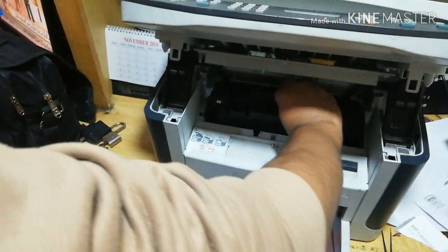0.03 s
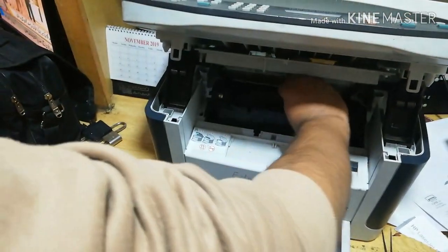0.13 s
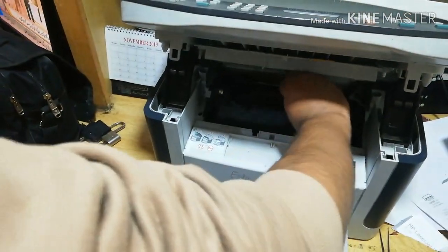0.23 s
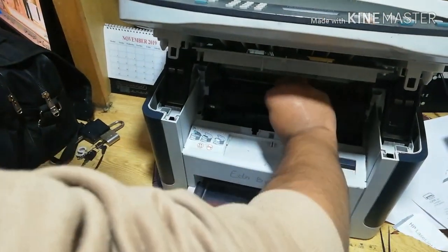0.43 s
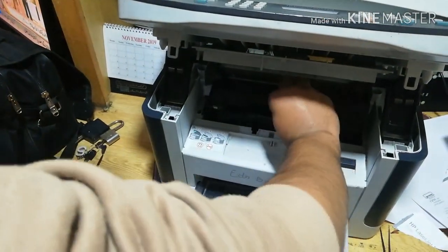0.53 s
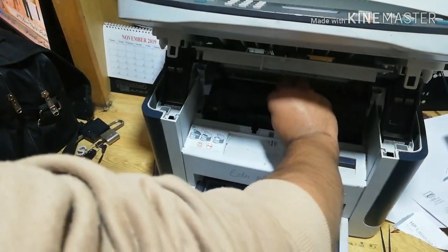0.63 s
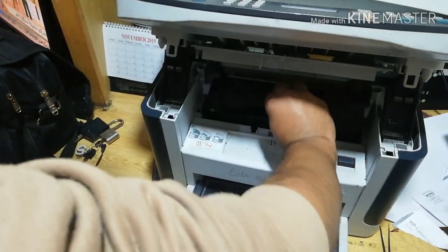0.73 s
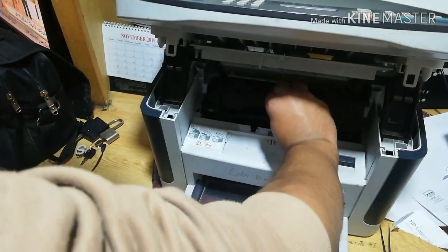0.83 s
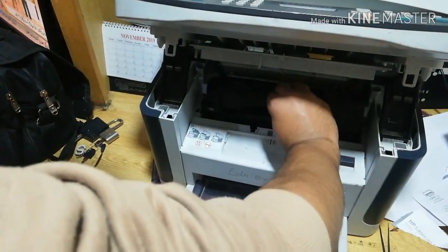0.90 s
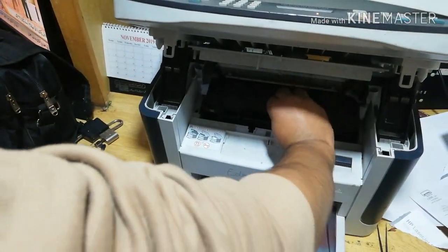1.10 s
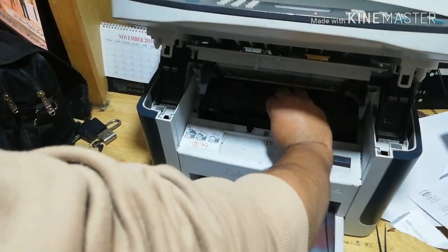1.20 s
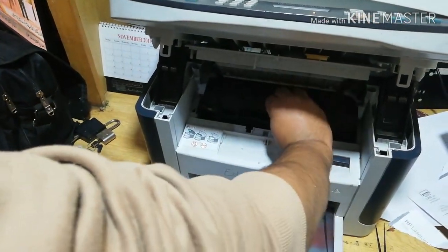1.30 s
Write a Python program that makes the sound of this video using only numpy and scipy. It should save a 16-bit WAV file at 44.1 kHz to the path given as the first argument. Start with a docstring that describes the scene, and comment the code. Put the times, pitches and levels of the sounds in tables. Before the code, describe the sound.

A toner cartridge clacks as a hand rocks it inside a printer. Light ticks lead to loud plastic clatter with hollow knocks, then brief scrapes, squeaks and a final snap, close to the microphone in a small, quiet room.

```python
"""Light plastic ticks and a faint scrape come first, then loud clacks: a hand rocks a toner cartridge
in the open bay of a desktop printer, close to a stereo microphone in a small, quiet room.
Edges strike the shell, the hollow cartridge knocks on its seat, the chassis thumps the desk and a
small spring pings. In between, the cartridge scrapes and squeaks along its guides; at last it snaps
home. The treble sits to the right, with short reflections and a low room rumble behind it."""
import sys
import numpy as np
from scipy import signal
from scipy.fft import rfft, irfft
from scipy.io import wavfile
from scipy.ndimage import uniform_filter1d

SR = 44100
rng = np.random.default_rng(int(sys.argv[2]) if len(sys.argv) > 2 else 0)


def bounce(signal):
    """Save signal as a 16-bit WAV file at the path given by the first command-line argument."""
    frames = np.transpose(np.atleast_2d(signal))
    limited = np.clip(frames, -1, 1)
    pcm = np.round(limited * 32767).astype(np.int16)
    wavfile.write(sys.argv[1], SR, pcm)


N = 59535
T = np.arange(N) / SR
HZ = np.maximum(np.arange(N + 1) * SR / (2 * N), 1)
ATTACK_S = .0018  # rise of plastic and spring contacts


# Colour of the plastic shell: f/Hz, relative level/dB
SHELL_COLOUR = [(60, -10.5), (150, -8), (210, -3.5), (330, -3.5), (410, -5), (560, -6.5), (780, -3.5),
                (950, -1), (1250, 0), (1750, -2), (2300, -2), (3100, -4), (5000, -8), (6400, -13),
                (8000, -11), (9700, -6.5), (10800, -16.5), (13000, -23), (15000, -37), (16500, -41)]
# Contacts in the bay: t/s, level/dB, lows/dB, treble/dB, t60/s, struck part's note f/Hz, its lift/dB
PLASTIC_CONTACTS = [(0.046, -48.5, -13, 11, 0.067, 1630, 12.5), (0.095, -63, -11, 8, 0.054, 2160, 18),
                    (0.114, -37.5, -25, 1.5, 0.075, 2220, 6), (0.1736, -38, -19, 8.5, 0.085, 2340, 12),
                    (0.186, -48, 3, 6, 0.18, 2310, 11), (0.2271, -28.5, -5, 5.5, 0.11, 3680, 14.5),
                    (0.243, -21.5, 4, -38, 0.058, 780, 7.5), (0.294, -40, -3, 4.5, 0.27, 1300, -5),
                    (0.311, -33.5, -10, -2, 0.1, 2550, 7.5), (0.3384, -23.5, -0.5, 2, 0.1, 5050, 14),
                    (0.35, -31.5, 7, -4, 0.21, 1850, 8.5), (0.396, -25.5, -1, 5.5, 0.1, 1280, 12),
                    (0.4, -22.5, -8.5, 8.5, 0.14, 2200, 5.5), (0.4185, -19.5, -23, -10, 0.15, 1252, 9),
                    (0.443, -26, -5, -4, 0.11, 1970, 9), (0.46, -25, -11, -16, 0.034, 1320, -10),
                    (.52, -38, 9, 1, .04, 3140, 19.5), (0.5317, -20.5, -9, 5, 0.044, 1404, 10),
                    (0.536, -27, -18, 9, 0.12, 2210, 20), (0.5422, -35.5, -36, 21, 0.033, 2280, 27.5),
                    (0.5547, -22, 1, 7, 0.036, 2200, 7), (0.686, -53.5, -6, 5, 0.36, 2050, 12.5),
                    (.8035, -30, -4, 6.5, 0.11, 1770, 6.5), (.859, -40, 0, 13, 0.026, 2370, 10),
                    (0.898, -37, -8, 2, 0.1, 3500, 14.5), (0.909, -48.5, 8.5, 27, 0.06, 1170, -5),
                    (1.0861, -30.5, -14, 1.5, 0.08, 1360, 12.5), (1.0899, -28.5, -18, 11, 0.036, 2220, 19),
                    (1.108, -25.5, -17.5, -14, 0.028, 2300, 3), (1.147, -17.5, -17, 9.5, 0.036, 2130, 7)]
def clacks(lows_hz=584, treble_hz=5600, note_spread=.4):
    """Edges excite dense, damped shell modes. Returns the direct sound and a plainer one that spreads."""
    lows = 1 / (1 + (HZ / lows_hz) ** 3)
    treble = 1 / (1 + (treble_hz / HZ) ** 3)
    direct, spread = 0, 0
    for start, db, lows_db, treble_db, t60, note_hz, lift_db in PLASTIC_CONTACTS:
        burst = stereo_noise() * grains() * struck(start, ATTACK_S, t60)
        body_db = unit_power(SHELL_COLOUR) + db + lows_db * lows + treble_db * treble
        note_db = lift_db * resonance(note_hz, relative_width=.07)
        direct += colour(burst, body_db + note_db)
        spread += colour(burst, body_db + note_spread * note_db)
    return direct, spread


# The shell's longer rings: f/Hz, relative level/dB, t60/s
PANEL_MODES = [(1160, -22, .25), (1262, -22, .25), (1365, -23, .24), (2100, -25, .2), (2240, -26, .2),
               (2288, -24, .22), (2417, -25, .2), (9200, -24, .14)]
def shell_rings(drive):
    """A few panel modes ring on after the contacts."""
    response = sum(from_db(db) * stereo_sine(hz) * struck(0, ATTACK_S, t60)
                   for hz, db, t60 in PANEL_MODES)
    return from_db(-45.5) * signal.fftconvolve(drive, response, axes=1)[:, :N]


# Cartridge against its seat: t/s, level/dB, f/Hz, t60/s
SEAT_KNOCKS = [(.229, -35.5, 222, 0.3), (.244, -27, 203, 0.12), (.34, -30.5, 216, 0.052),
               (.349, -24.5, 339.4, 0.062), (.398, -32, 303, 0.1), (.56, -39, 236.3, 0.38),
               (.9, -44, 206, 0.54)]
def knocks():
    """Each knock wakes one low mode of the hollow cartridge, dead centre at the microphone."""
    return bumps(SEAT_KNOCKS, attack_s=.0033)


# Chassis against the desk: t/s, level/dB, f/Hz, t60/s
DESK_THUMPS = [(.02, -49.5, 46, 0.73), (.238, -40, 99.6, 0.14), (.34, -37.5, 90, 0.18),
               (.42, -31.5, 118.4, .17), (.531, -33, 81.4, 0.27), (.575, -35, 122.3, 0.22),
               (1.09, -38.5, 84, .1), (1.163, -39.5, 91.4, .18), (1.185, -42, 117.5, 0.14)]
def thumps():
    """The heavy chassis bumps the desk, one soft bass note at a time."""
    return bumps(DESK_THUMPS, attack_s=.012)


# Flicks of the spring: t/s, level/dB
SPRING_FLICKS = [(.339, -31.5), (0.5185, -38.5), (0.896, -40.5)]
# Its modes: f/Hz, relative level/dB, t60/s
SPRING_NOTES = [(4720, 9.5, 0.021), (4960, 8, 0.022), (5260, -4, 0.035)]
def pings():
    """The flicked spring rings in short, high notes."""
    return sum(from_db(db + mode_db) * stereo_sine(hz) * struck(start, ATTACK_S, t60)
               for start, db in SPRING_FLICKS for hz, mode_db, t60 in SPRING_NOTES)


# Slides along the guides: t/s, length/s, level/dB
GUIDE_SLIDES = [(-.02, 0.068, -54.5), (0.151, 0.088, -44.5), (0.565, 0.15, -49), (0.842, 0.097, -37.5),
                (1.063, 0.095, -43.5), (1.188, .07, -53)]
def scrapes():
    """Grainy friction sounds through the shell."""
    pressure = sum(from_db(db) * stroke(start, length) for start, length, db in GUIDE_SLIDES)
    return colour(stereo_noise() * grains() * pressure, unit_power(SHELL_COLOUR))


# Squeaks on the guides: t/s, length/s, rasp level/dB, tone level/dB, first slip f/Hz, last slip f/Hz
GUIDE_SQUEAKS = [(0.766, 0.036, -40, -45.5, 1400, 960), (1.016, 0.063, -36.5, -40, 1090, 1170)]
# Colour of the rasp: f/Hz, relative level/dB
RASP_COLOUR = [(400, -26), (850, -6.5), (1300, -5), (1800, -13), (3000, -9), (6500, -19), (8600, -9),
               (9900, 2.5), (11000, -12.5), (14000, -22), (16500, -33)]
def squeaks(rasp_depth=.55):
    """Plastic sticks and slips in an unsteady tone; each slip lets out a puff of bright rasp."""
    tones, rasp = 0, 0
    for start, length, rasp_db, tone_db, first_hz, last_hz in GUIDE_SQUEAKS:
        slip_hz = np.interp(T, [start, start + length], [first_hz, last_hz])
        slip = unsteady_tone(slip_hz, jitter=.025)
        swell = stroke(start, length)
        tones += from_db(tone_db) * swell * slip
        rasp += from_db(rasp_db) * swell * (1 + rasp_depth * slip) * stereo_noise()
    return tones + colour(rasp, unit_power(RASP_COLOUR))


# The guide's whistle: t/s, length/s, level/dB, f/Hz
GUIDE_WHISTLE = (.872, .04, -41, 5150)
def whistle():
    """Friction feeds one thin, high tone during a slide."""
    start, length, db, hz = GUIDE_WHISTLE
    return from_db(db) * stroke(start, length) * unsteady_tone(hz, jitter=.0077)


# Decay of the small room: f/Hz, t60/s
ROOM_DECAY = [(100, 0.92), (250, 0.4), (600, 0.29), (2000, 0.27), (5000, 0.24), (10000, 0.21),
              (16000, 0.16)]
# Strength of its reflections: f/Hz, level/dB relative to the sound sent in
ROOM_GAIN = [(80, 1.5), (250, 4), (700, -3.5), (2000, -7), (5000, -7), (10000, -9)]
def room(sound, bands=12, delay_s=.0039, build_s=.0046):
    """Diffuse reflections of bay and room reach the microphone just late and die band by band."""
    noise = rfft(stereo_noise(), 2 * N)
    centres_hz = np.geomspace(60, 16000, bands)
    response = 0
    for hz, weights in zip(centres_hz, np.eye(bands)):
        band = irfft(noise * np.interp(np.log(HZ), np.log(centres_hz), weights))[:, :N]
        tail = struck(delay_s, build_s, at_hz(ROOM_DECAY, hz))
        tail /= np.sqrt(np.sum(tail ** 2))
        response += band * tail * from_db(at_hz(ROOM_GAIN, hz))
    mono = sound.sum(axis=0, keepdims=True) / np.sqrt(2)
    return signal.fftconvolve(mono, response, axes=1)[:, :N]


# Colour of the quiet room: f/Hz, relative level/dB
RUMBLE_COLOUR = [(20, -33), (48, 7), (75, -5.5), (110, 2.5), (155, -10), (220, 0.5), (320, -11.5),
                 (480, -36), (1500, -28), (5000, -30), (10000, -34), (16000, -38)]
def room_tone(level_db=-55.5):
    """A faint, steady rumble lies under everything."""
    return from_db(level_db) * colour(stereo_noise(), unit_power(RUMBLE_COLOUR))


# Balance at the microphone for a share of 1: f/Hz, left minus right level/dB
MIC_BALANCE = [(400, 0), (1200, -2.5), (2100, -8.5), (4500, -3.5), (6500, -4.5), (9200, -14.5), (15000, -9)]
def lean_right(sound, share):
    """The treble reaches the right side more strongly."""
    lean_db = share * at_hz(MIC_BALANCE)
    mean_db = 10 * np.log10((1 + from_db(lean_db) ** 2) / 2)
    return np.array([colour(sound[0], lean_db - mean_db), colour(sound[1], -mean_db)])


# Stereo width at the microphone: f/Hz, side minus mid level/dB
MIC_WIDTH = [(60, -22), (160, -15), (280, -9), (480, 0), (1200, -3.5), (2000, 0), (9000, 0)]
def stereo_noise():
    """White noise, alike on both sides in the bass and unrelated in the treble."""
    side_power = from_db(at_hz(MIC_WIDTH)) ** 2
    mid, side = rfft(rng.standard_normal((2, 2 * N)))
    side *= np.sqrt(side_power)
    return irfft(np.array([mid + side, mid - side]) / np.sqrt(1 + side_power))[:, :N]


def stereo_sine(hz):
    """A sine with a random phase on each side."""
    return np.sin(2 * np.pi * hz * T + rng.uniform(0, 2 * np.pi, (2, 1)))


def unsteady_tone(hz, jitter, samples=40):
    """A sine whose pitch wavers from one millisecond to the next."""
    wobble = uniform_filter1d(rng.standard_normal(N), samples) * np.sqrt(samples)
    return np.sin(2 * np.pi * np.cumsum(hz * (1 + jitter * wobble)) / SR)


def bumps(contacts, attack_s):
    """Soft, heavy contacts, each waking one low mode."""
    return sum(from_db(db) * np.sin(2 * np.pi * hz * (T - start)) * struck(start, attack_s, t60)
               for start, db, hz, t60 in contacts)


def grains(spread_db=2, samples=30):
    """Uneven strength of the tiny contacts between two surfaces; rms 1."""
    grain_db = spread_db * rng.standard_normal(N // samples + 1)
    gain = from_db(np.interp(np.arange(N) / samples, np.arange(len(grain_db)), grain_db))
    return gain / np.sqrt(np.mean(gain ** 2))


def struck(start, attack, t60):
    """Quick rise, then exponential decay."""
    rise = np.clip((T - start) / attack, 0, 1)
    return rise * from_db(-60 * np.maximum(T - start - attack, 0) / t60)


def stroke(start, length):
    """Smooth swell and fade of a sliding move."""
    return np.sin(np.pi * np.clip((T - start) / length, 0, 1))


def resonance(hz, relative_width):
    """Bell curve around one pitch; 1 on top."""
    return 1 / (1 + (np.log(HZ / hz) / relative_width) ** 2)


def colour(sound, db):
    """Causal (minimum-phase) filter with the given gain at each frequency."""
    cepstrum = irfft(np.log(from_db(db)))
    cepstrum[1:N] *= 2
    cepstrum[N + 1:] = 0
    return irfft(rfft(sound, 2 * N) * np.exp(rfft(cepstrum)))[..., :N]


def unit_power(points):
    """A spectrum in dB that keeps the power of white noise."""
    db = at_hz(points)
    return db - 10 * np.log10(np.mean(from_db(db) ** 2))


def at_hz(points, hz=HZ):
    """Read a table on a log-frequency axis."""
    table_hz, values = np.transpose(points)
    return np.interp(np.log(hz), np.log(table_hz), values)


def from_db(db):
    """Decibels to gain."""
    return 10 ** (np.asarray(db) / 20)


def scene():
    """At the microphone: the printer close up, its reflections and the room tone behind."""
    direct, spread = clacks()
    sliding = scrapes()
    rings = shell_rings(spread + sliding)
    small_parts = pings() + squeaks() + whistle()
    # spring and guides excite the room less than the shell does
    reflections = room(spread + sliding + rings + .55 * small_parts)
    printer = lean_right(direct + sliding + rings + small_parts, share=.94) + knocks() + thumps()
    return printer + lean_right(reflections, share=.69) + room_tone()


def record(dry, peak_limit=.6, cutoff_hz=16300):
    """The highest peaks are rounded and the top is cut steeply."""
    rounded = peak_limit * np.tanh(dry / peak_limit)
    return signal.sosfilt(signal.cheby2(16, 60, cutoff_hz, fs=SR, output="sos"), rounded)


dry = scene()
out = record(dry)
bounce(out)
```